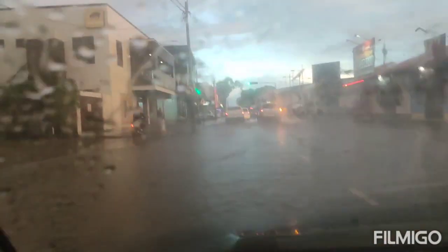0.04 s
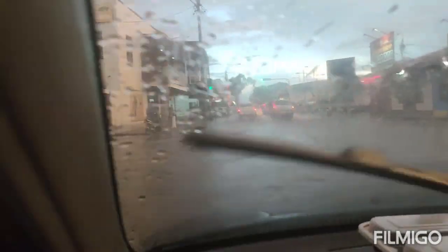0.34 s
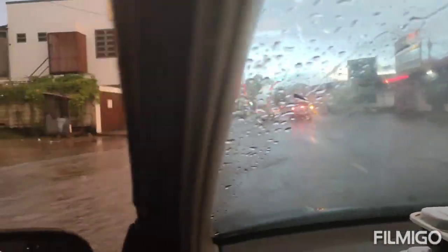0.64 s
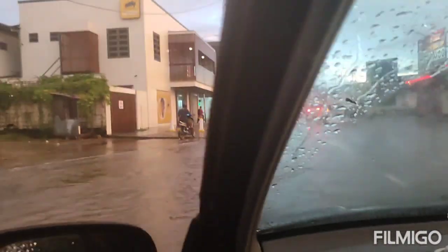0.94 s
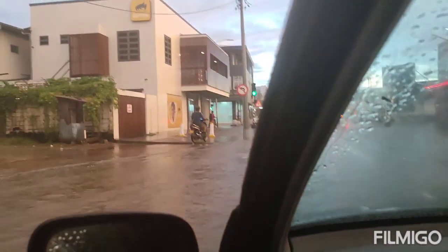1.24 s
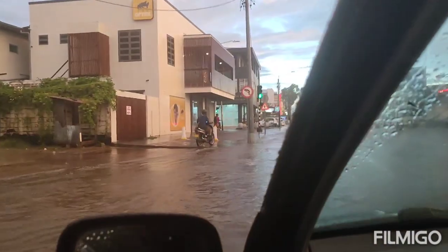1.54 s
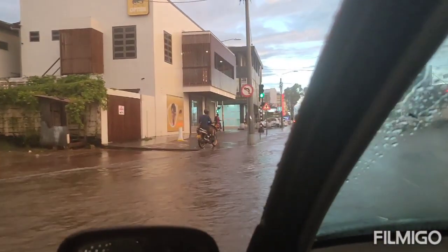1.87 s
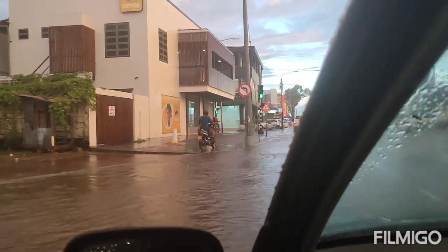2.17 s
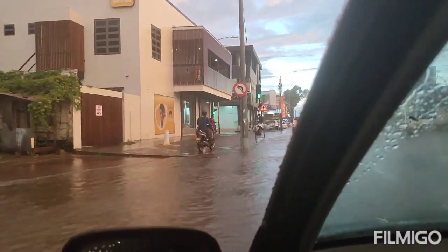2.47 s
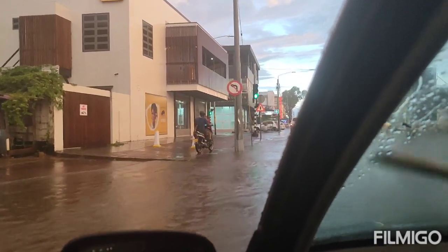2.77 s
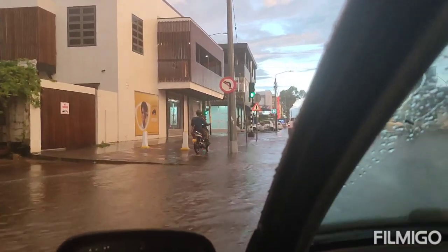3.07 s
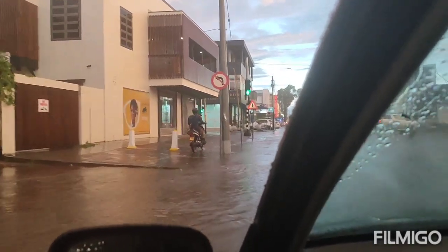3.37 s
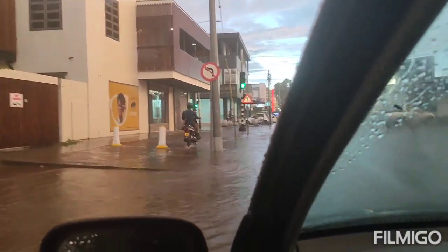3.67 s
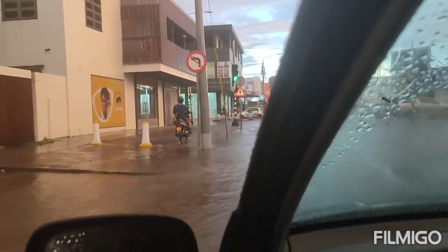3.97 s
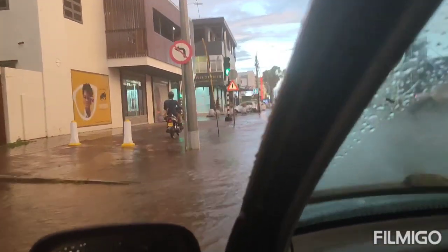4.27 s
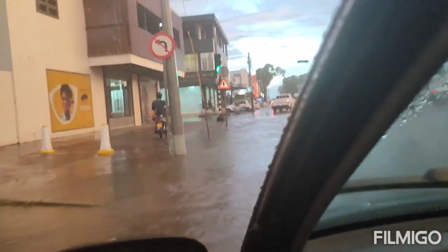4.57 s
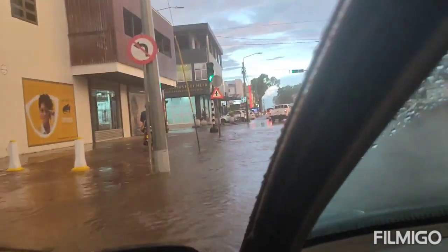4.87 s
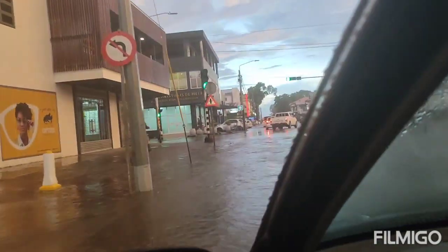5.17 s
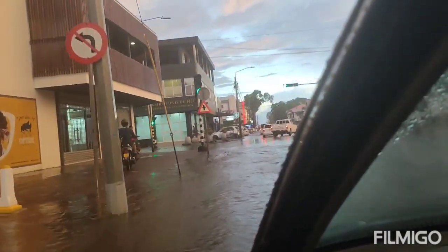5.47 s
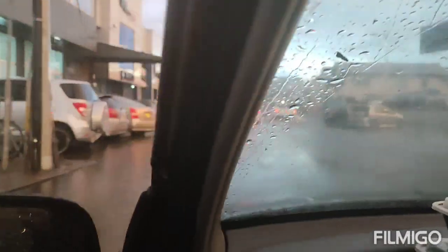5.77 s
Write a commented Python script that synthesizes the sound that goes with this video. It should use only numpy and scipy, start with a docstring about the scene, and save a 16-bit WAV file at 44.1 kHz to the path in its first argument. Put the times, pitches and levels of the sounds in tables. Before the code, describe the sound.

A car drives slowly through a flooded street, heard from inside: low engine drone and tyre rumble under steady splashing and hissing spray.

```python
"""Driving through a flooded street

A slow car is heard from inside, by the open left window. The engine's firing orders drone in the
cabin's air resonances and ease off near the end; the tyres rumble and hum. Bubbles ring in the
churned water, spray hisses, and dull knocks, slaps and plops come through. The wet brakes sing
faintly by stick-slip friction before the sound fades out."""
import sys
import numpy as np
from scipy import signal
from scipy.fft import rfft, irfft, next_fast_len
from scipy.io import wavfile

SR = 44100
rng = np.random.default_rng(int(sys.argv[2]) if len(sys.argv) > 2 else 0)


def put_to_file(sound):
    """Save the sound as 16-bit audio at rate SR, in the file named by the first command-line argument."""
    columns = np.atleast_2d(sound).T  # one column per channel
    safe = np.clip(columns, -1, 1)
    whole_steps = np.round(safe * 32767)
    wavfile.write(sys.argv[1], SR, whole_steps.astype(np.int16))


N = 256948
TIME = np.arange(N) / SR
FFT_SIZE = next_fast_len(N + 4096)
BIN_HZ = np.maximum(np.arange(FFT_SIZE // 2 + 1) * SR / FFT_SIZE, 1)

# Level difference between the two microphone ports. Each row: frequency in Hz, left minus right in dB.
PORT_BALANCE = [(40, -2.5), (90, -3), (140, 0), (220, -0.5), (450, 3), (750, 2.5), (1200, 2), (1600, -0.5),
                (2100, -4.5), (2700, -1), (3500, -2), (4500, 1.5), (7500, -0.5), (8600, 9.5), (10500, -5.5),
                (13000, 4)]
# Sound from the window reaches the left port first. Each row: frequency in Hz, phase lead in radians.
LEFT_LEAD = [(40, -.12), (90, -.12), (140, .12), (230, .06), (350, .3), (500, .95), (750, 1.25),
             (1100, 1.8), (1650, 2.7), (2100, 3.5), (2700, 6.28)]
# Lean of the spray as the microphones turn to the window.
# Each row: time in seconds, left minus right in dB.
WINDOW_SIDE = [(0, 0), (.7, 0), (1.6, 4), (5.6, 4)]


def from_db(db):
    """Decibels to amplitude ratio."""
    return 10 ** (np.asarray(db) / 20)


def rms_one(x):
    """Scale to rms 1."""
    return x / np.sqrt(np.mean(x ** 2) + 1e-20)


def in_time(rows):
    """Interpolate a table's value columns at every sample; a single column gives a single curve."""
    seconds, *columns = np.transpose(rows)
    return np.squeeze([np.interp(TIME, seconds, column) for column in columns])


def at_hz(rows, hz):
    """Interpolate a table on a log-frequency axis."""
    row_hz, values = np.transpose(rows)
    return np.interp(np.log(hz), np.log(row_hz), values)


def pan(left_db):
    """Left and right gains of mean 1 for a given level difference."""
    gains = from_db(np.array([[.5], [-.5]]) * left_db)
    return gains / gains.mean(0)


def drift(rate):
    """Low-passed noise of rms 1 that moves about `rate` times a second."""
    pole = np.exp(-80 * np.pi * rate / SR)
    slow = signal.lfilter([1], [1, -2 * pole, pole * pole], rng.standard_normal(N // 40 + 2002))[2000:]
    return np.interp(np.arange(N) / 40, np.arange(len(slow)), rms_one(slow))


def crest(peak_s, rise_s, fall_s):
    """A Gaussian envelope of height 1 with its own rise and fall."""
    width_s = np.where(TIME < peak_s, rise_s, fall_s)
    return np.exp(-np.minimum(((TIME - peak_s) / width_s) ** 2, 40))


def swell(start, length):
    """A half-ellipse envelope of height 1."""
    along = np.clip((TIME - start) / length, 0, 1)
    return 2 * np.sqrt(along * (1 - along))


def ring(clicks, hz, t60):
    """A damped oscillator: a unit impulse starts a sine of height 1 that loses 60 dB in t60 seconds."""
    pole, step = from_db(-60 / (t60 * SR)), 2 * np.pi * hz / SR
    return signal.lfilter([0, np.sin(step)], [1, -2 * pole * np.cos(step), pole * pole], clicks + 1e-18)


def at_ports(pair, colour):
    """Partial coherence: two signals are coloured and mixed to left and right, whose mean has rms 1."""
    # Likeness of the two ports. Each row: frequency in Hz, coherence from 0 to 1.
    likeness = [(60, .96), (210, 0.75), (330, 0.66), (500, 0.6), (700, 0.75), (1000, 0.7), (1300, 0.26),
                (1650, .5), (2100, 0.2), (2700, .25), (3400, 0), (5700, 0), (6600, 0.9), (14000, 0.66)]
    coherence = np.clip(at_hz(likeness, BIN_HZ), 0, .995)
    mid, side = rfft(pair, FFT_SIZE) * from_db(at_hz(colour, BIN_HZ))
    side = side * np.sqrt((1 - coherence) / (1 + coherence))
    lag = np.exp(-1j * at_hz(LEFT_LEAD, BIN_HZ))
    spectra = np.array([mid + side, (mid - side) * lag]) * pan(at_hz(PORT_BALANCE, BIN_HZ))
    out = irfft(spectra, FFT_SIZE)[:, :N]
    return out / np.std(out.mean(0))


def engine():
    """Forced resonance: harmonics of the firing rate swell as they meet the cabin's air modes."""
    # Engine speed. Each row: time in seconds, firings per second.
    speed = [(0.0, 38.4), (0.3, 38.2), (0.47, 39.0), (0.72, 39.7), (0.9, 39.3), (1.08, 40.3), (1.45, 40.7),
             (1.93, 41.8), (3.1, 42.5), (3.5, 43.3), (4.55, 43.7), (4.75, 42.0), (4.83, 39.2), (4.93, 37.6),
             (5.15, 36.1), (5.6, 36.8)]
    # Load from pushing through water brings out the overtones. Each row: time in seconds, gain in dB.
    load = [(0, 1), (1.0, -4), (2.0, -3.5), (2.6, -2.5), (3.5, 0), (4.3, 3.5), (4.7, -4), (5.6, -3)]
    # Strength of the fundamental, the boom. Each row: time in seconds, gain in dB.
    boom = [(0, 0.5), (.6, 0), (.9, 0), (1.7, .5), (2.1, -1), (3.3, 2.5), (4.0, .5), (4.55, 0.5),
            (4.76, -4.5), (4.84, -.5), (4.95, -1.5), (5.1, 2), (5.6, 0)]
    # Brief dips of the boom. Each row: time of the lowest point in seconds, gain in dB.
    sags = [(.49, -4), (.78, -0.5), (1.17, -3), (1.91, -6), (2.41, -7.5), (2.7, -12), (3.19, -7),
            (3.63, -3), (4.15, -4.5)]
    # Lean of the boom as the microphones move. Each row: time in seconds, left minus right in dB.
    boom_side = [(0, -2), (.7, -4), (5.6, -5.5)]
    # Air resonances of the cabin. Each row: frequency in Hz, width in Hz, peak response in dB.
    modes = [(38.09, 6.94, -18), (77.4, 11.1, -32.5), (111, 10, -41.5), (128, 5.6, -34), (151.4, 16, -43.5),
             (210.4, 8.3, -43)]
    firing_hz, load_db = in_time(speed), in_time(load)
    phase = 2 * np.pi * np.cumsum(firing_hz * (1 + .0029 * drift(6.6))) / SR
    boom_db = in_time(boom) + sum(db * crest(s, rise_s=.038, fall_s=.038) for s, db in sags)
    drone = 0
    for order in range(1, 6):
        hz = order * firing_hz
        cabin = sum(from_db(db) / (1 + (2 * (hz - centre) / width) ** 2) for centre, width, db in modes)
        lead = np.array([[.5], [-.5]]) * at_hz(LEFT_LEAD, hz.mean())
        angle = order * phase + lead + rng.uniform(0, 2 * np.pi)
        waver = drift(8)   # uneven combustion and pull against the water
        if order == 1:
            tone = np.sin(angle) * from_db(boom_db + .6 * waver) * pan(in_time(boom_side))
        else:
            angle = angle + .15 * drift(8)
            tone = np.sin(angle) * from_db(load_db + .9 * waver) * pan(at_hz(PORT_BALANCE, hz.mean()))
        drone = drone + cabin * tone
    return np.sqrt(2) * drone


def road_noise():
    """Structure-borne noise: road roughness makes the floor rumble and the tyres roar through the body."""
    # Roughness of the road under the water. Each row: time in seconds, relative level in dB.
    roughness = [(0, -8), (.2, 2), (.35, -5.5), (.85, -4), (1.25, 2), (1.75, 3), (2.1, -3.5), (2.5, 3),
                 (3.4, -1), (4.1, -2.5), (4.4, 0), (4.8, -3), (5.1, -2), (5.6, -1)]
    # Spectra of the rumble and the roar. Each row: frequency in Hz, relative density in dB.
    rumble_colour = [(15, -13.5), (24, 3), (34, 11.5), (46, 5), (60, 6.5), (90, 4), (145, 4), (195, -3.5),
                     (260, -12), (450, -38.5)]
    roar_colour = [(100, -12), (165, 3.5), (215, -8), (280, 1), (330, -3.5), (400, -4.5), (460, -10),
                   (700, -26), (1500, -51)]
    road_db = in_time(roughness)
    rumble = at_ports(rng.standard_normal((2, N)), rumble_colour)
    rumble *= from_db(-31 + .37 * road_db + drift(18))
    roar = at_ports(rng.standard_normal((2, N)), roar_colour)
    roar *= from_db(-40.5 + road_db + drift(10.6))
    return rumble + roar


def tyre_hum(cavity_hz=203, width_hz=26):
    """Cavity resonance: the ring of air in a tyre picks out tread harmonics and a band of road noise."""
    # The tread beating on the road. Each row: time in seconds, beats per second, hum gain in dB.
    tread = [(0, 22.5, -35), (.7, 24, -48), (1.35, 24.5, -31.5), (1.65, 24.3, -33), (1.95, 23.7, -39),
             (2.35, 25.2, -34.5), (2.58, 26.1, -39), (2.68, 25.8, -31), (2.92, 24.9, -28),
             (3.25, 24.9, -35), (3.55, 24.9, -36.5), (3.7, 24, -36), (4.04, 23.2, -34.5), (4.17, 22.8, -50),
             (4.6, 22.3, -42), (4.95, 20.6, -41), (5.6, 17, -46)]
    beat_hz, hum_db = in_time(tread)
    phase = 2 * np.pi * np.cumsum(beat_hz) / SR
    hum = 0
    for order in range(6, 15):
        resonance = 1 / np.hypot(1, (2 * (order * beat_hz - cavity_hz) / width_hz) ** 2)
        # Uneven grip on the wet road unsettles phase and level.
        angle = order * phase + rng.uniform(0, 2 * np.pi) + .16 * drift(8)
        hum = hum + resonance * from_db(.7 * drift(8)) * np.sin(angle)
    cavity = signal.butter(2, [cavity_hz - width_hz, cavity_hz + width_hz], "band", fs=SR, output="sos")
    cavity_noise = rms_one(signal.sosfilt(cavity, rng.standard_normal(N)))
    return from_db(hum_db) * (hum + from_db(-13) * cavity_noise / np.sqrt(2))


def droplets(per_s, spread_db):
    """Shot noise: random impacts, mostly small and a few large, arrive in clumps."""
    lands = rng.random(N) < per_s * from_db(2 * drift(30)) / SR
    sizes = from_db(spread_db * np.minimum(rng.exponential(1, N), 4))
    return lands * sizes * rng.standard_normal((2, N))


def bubbles(low_hz, high_hz, per_s, cycles, count=28):
    """Bubble resonance: impacts excite bubbles of many sizes, each ringing for `cycles` periods."""
    hits = droplets(per_s, spread_db=2)
    size_index = rng.integers(0, count, N)
    pitches = enumerate(np.geomspace(low_hz, high_hz, count))
    return rms_one(sum(ring(hits * (size_index == k), hz, cycles / hz) * np.sqrt(hz) for k, hz in pitches))


def wash(colour, grains, grain_db, flutter_db, flutter_rate):
    """Incoherent addition: far drops merge into a rush under nearer grains, fluttering as water tears."""
    rush = at_ports(rng.standard_normal((2, N)), colour) + from_db(grain_db) * at_ports(grains, colour)
    rush *= from_db(flutter_db * drift(flutter_rate))
    return rush / np.std(rush.mean(0))


def flow():
    """Water thrown up, in dB: the flood's depth plus a quick rise and slower fall for each wave."""
    # Flow set by the depth of the flood. Each row: time in seconds, relative level in dB.
    depth = [(0, -4), (.85, -2), (1.05, -1), (1.7, 0.5), (2.5, 0), (3.3, -0.56), (4.4, -1.5), (5.0, -1.8),
             (5.6, 1)]
    # Waves that the wheels plough into. Each row: time of the crest in seconds, added level in dB.
    surges = [(1.33, 1), (1.73, 1), (2.26, 1.5), (2.45, 1.6), (3.19, 2), (3.47, 2.5), (3.8, 2), (4.63, 2.5),
              (4.82, 3)]
    return in_time(depth) + sum(db * crest(s, rise_s=.05, fall_s=.06) for s, db in surges)


def churn():
    """Large bubbles resonate at low pitch in the water under the wheels."""
    # Spectrum of the churning. Each row: frequency in Hz, relative density in dB.
    colour = [(200, -18), (400, -4.5), (500, -4), (620, -0.5), (850, -2.5), (1120, -3), (1350, -2),
              (1520, -0.5), (1680, -3.5), (2400, -7.5), (5000, -43)]
    # Strength of the churning. Each row: time in seconds, level in dB.
    strength = [(0, -44.5), (.45, -46.5), (.8, -42), (1.05, -41), (1.45, -39.5), (2.1, -40.5), (3.2, -40.5),
                (3.75, -42.5), (4.6, -41.5), (5.0, -42), (5.3, -40), (5.6, -40)]
    grains = bubbles(450, 1700, per_s=900, cycles=13)
    rush = wash(colour, grains, grain_db=-5.5, flutter_db=.6, flutter_rate=30)
    return rush * from_db(in_time(strength))


def splash():
    """Small bubbles resonate at high pitch in the wheel arches, louder as the flow grows."""
    # Spectrum of the splashing. Each row: frequency in Hz, relative density in dB.
    colour = [(900, -24.5), (1450, -15.5), (1650, -3), (1950, 1), (2350, -1.5), (2800, -0.5), (3400, -3.5),
              (4200, -6.5), (5500, -16.5), (9000, -41.5)]
    grains = bubbles(1700, 4800, per_s=1200, cycles=24)
    rush = wash(colour, grains, grain_db=-4, flutter_db=.35, flutter_rate=35)
    return rush * from_db(-41 + flow()) * pan(.6 * in_time(WINDOW_SIDE))


def spray(treble_hz=9600):
    """Impact noise of fine drops hisses past the window; acoustic shadowing dulls its top at first."""
    # Spectrum of the spray. Each row: frequency in Hz, relative density in dB.
    colour = [(2000, -13), (4000, -9.5), (5000, -4.5), (6000, -2.5), (6500, 1.5), (7500, 3.5), (8300, 0),
              (9000, -2), (9600, -7.5), (10400, -5.5), (11700, -1), (13000, -1.5), (14400, -8.5)]
    # Treble shaded until the microphones face the window. Each row: time in seconds, gain in dB.
    shade = [(0, -5), (.35, -6.5), (.65, -3.5), (.95, -2), (2.2, -0.1), (5.6, -1)]
    grains = droplets(per_s=5000, spread_db=2.2)
    hiss = wash(colour, grains, grain_db=-4, flutter_db=.6, flutter_rate=18)
    treble = signal.sosfiltfilt(signal.butter(2, treble_hz, "high", fs=SR, output="sos"), hiss)
    hiss += (from_db(in_time(shade)) - 1) * treble
    return hiss * from_db(-39.5 + flow()) * pan(in_time(WINDOW_SIDE))


def swishes(width_hz=610):
    """Narrow-band noise: sheets of water swell and die in the right wheel arch, each at its own pitch."""
    # Each row: start in seconds, length in seconds, centre frequency in Hz, level in dB.
    sheets = [(-.2, 0.99, 2368, -44), (0.39, 0.04, 2320, -43), (0.197, 0.6, 539.7, -44),
              (0.946, .3, 1242, -42), (1.52, 0.42, 2349, -41.5), (2.0, 0.47, 2387, -45),
              (2.65, 0.45, 2590, -48), (3.2, 1.3, 2348, -51), (4.1, 2, 3424, -46.5)]
    narrow = signal.butter(2, width_hz / 2, fs=SR, output="sos")
    in_phase, quadrature = signal.sosfilt(narrow, rng.standard_normal((2, 2, N)))
    out = 0
    for start, length, centre_hz, db in sheets:
        phase = 2 * np.pi * centre_hz * TIME
        hiss = rms_one(in_phase * np.cos(phase) + quadrature * np.sin(phase))
        out = out + from_db(db) * swell(start, length) * hiss
    return out * pan(-1.6)


def knocks(vary_db=2.5):
    """Modal ringing: each dull blow in the cabin excites every damped mode with a strength of its own."""
    # Each row: time in seconds, level in dB.
    blows = [(.016, -30.5), (.045, -27), (.073, -28), (.101, -27.5), (.131, -28), (.151, -31), (.163, -34),
             (.170, -26), (1.213, -29.5), (1.595, -27), (1.983, -34.5), (2.464, -34.5), (2.803, -31),
             (3.026, -30.5), (3.464, -32), (4.245, -30), (4.467, -33), (5.357, -32), (5.56, -32)]
    # Each row: frequency in Hz, gain in dB, time to decay by 60 dB in seconds.
    modes = [(112, 1, 0.077), (221, 1, 0.041), (267, 2, 0.038), (342, 0.5, 0.039), (425, -2.5, 0.027),
             (606, -2, 0.016)]
    onsets, blow_db = [round(s * SR) for s, db in blows], np.array(blows)[:, 1]
    out = np.zeros(N)
    for k, (hz, mode_db, t60) in enumerate(modes):
        clicks = np.zeros(N)
        clicks[onsets] = from_db(blow_db + mode_db + vary_db * rng.standard_normal(len(onsets)))
        out += (-1) ** k * ring(clicks, hz, t60)
    return out


def slaps(edge_ratio=1.13):
    """Bursts of impact noise: handfuls of spray hit the door, lower in pitch for coarser drops."""
    # Each row: time of the crest in seconds, centre frequency in Hz, level in dB.
    handfuls = [(.384, 3500, -49), (1.299, 7500, -39.5), (1.434, 3700, -45), (1.707, 7500, -44),
                (1.78, 7500, -44), (2.428, 3600, -46), (2.475, 7500, -43), (3.169, 3900, -43),
                (3.219, 7500, -42.5), (3.438, 3500, -43), (4.188, 4200, -46), (4.561, 3250, -42.5),
                (5.35, 3500, -45), (5.578, 7200, -43)]
    drops = droplets(per_s=4000, spread_db=2)[0]
    out = 0
    for s, hz, db in handfuls:
        band = signal.butter(2, [hz / edge_ratio, hz * edge_ratio], "band", fs=SR, output="sos")
        patter = rms_one(signal.sosfilt(band, drops + 1e-18))
        out = out + from_db(db) * crest(s, rise_s=.009, fall_s=.015) * patter
    return out * pan(.6 * in_time(WINDOW_SIDE))


def plops(count=9, gap_s=.0022, loss_db=.9, t60=.026, rise_per_s=1.5):
    """Bubble resonance: a gob of water breaks into a run of like bubbles, each rising in pitch as it dies."""
    # Each row: start in seconds, pitch in Hz, peak level of the first bubble in dB.
    gobs = [(.403, 2280, -33), (1.055, 690, -38.5), (1.145, 2700, -38), (1.68, 2500, -35),
            (1.76, 2410, -35.5), (2.025, 800, -39), (2.125, 2125, -37), (2.33, 2100, -36),
            (2.466, 2750, -36), (2.541, 1840, -37.5), (2.712, 2755, -35), (2.895, 2810, -36),
            (2.959, 575, -39), (3.198, 745, -35.5), (3.205, 2200, -37), (3.438, 920, -39),
            (3.671, 2160, -32), (4.158, 1420, -37), (4.182, 1250, -40), (4.242, 640, -41),
            (4.402, 630, -39), (4.553, 2985, -36.5), (5.068, 1035, -41), (5.588, 2400, -37)]
    out, age = np.zeros(N), np.arange(SR // 8) / SR
    for start, pitch_hz, db in gobs:
        for k, (late, detune, polarity) in enumerate(rng.uniform(-1, 1, (count, 3))):
            onset = round((start + gap_s * k * (1 + .3 * late)) * SR)
            hz = pitch_hz * (1 + .11 * detune) * (1 + rise_per_s * age)
            level = from_db(db - loss_db * k - 60 * age / t60)
            tone = np.sign(polarity) * np.sin(2 * np.pi * np.cumsum(hz) / SR)
            out[onset:onset + len(age)] += level * tone
    return out


def brakes(grabs_per_s=15.5):
    """Stick-slip friction: pads sing on wet discs; grabs lift level and pitch, the water film adds rasp."""
    # Each row: start in seconds, length in seconds, pitch in Hz, level in dB, phase jitter in radians.
    squeals = [(4.91, .08, 2800, -45.5, .3), (5.09, .08, 2790, -45, .3), (5.168, .105, 1968, -40.5, .1),
               (5.172, .05, 1510, -45, .6), (5.21, .05, 2790, -42.5, .3), (5.24, .06, 2670, -43.5, .4),
               (5.29, .18, 2785, -42, .4), (5.51, .1, 2820, -43, .6)]
    out = np.zeros(N)
    for start, length, pitch_hz, db, rough in squeals:
        grab = np.sin(2 * np.pi * grabs_per_s * (TIME - start) + .4 * drift(10))
        hz = pitch_hz * (1 + .012 * rough * grab + .00279 * drift(54.5))
        flutter = 1 + min(1.5 * rough, .6) * grab
        level = from_db(db + 3 * rough * drift(27)) * swell(start, length) * flutter
        out += level * np.sin(2 * np.pi * np.cumsum(hz) / SR + rough * drift(120))
    return out


def scene():
    """Superposition: all the sources add at the microphones in the cabin."""
    car = knocks() + engine() + road_noise() + tyre_hum()
    water = churn() + splash() + spray()
    ripple = from_db(.3 * drift(14))   # ripples in the flood move all three together
    return car + water * ripple + swishes() + plops() + slaps() + brakes()


def record(dry):
    """A raised-cosine fade ends the sound, and a steep low-pass cuts the highest treble."""
    fade_start_s, fade_end_s, cutoff_hz = 5.602, 5.695, 14330
    remaining = np.clip((fade_end_s - TIME) / (fade_end_s - fade_start_s), 0, 1)
    fade = np.sin(np.pi / 2 * remaining) ** 2
    low_pass = 1 / np.sqrt(1 + (BIN_HZ / cutoff_hz) ** 400)
    return irfft(rfft(dry * fade, FFT_SIZE) * low_pass, FFT_SIZE)[:, :N]


dry = scene()
out = record(dry)
put_to_file(out)
```